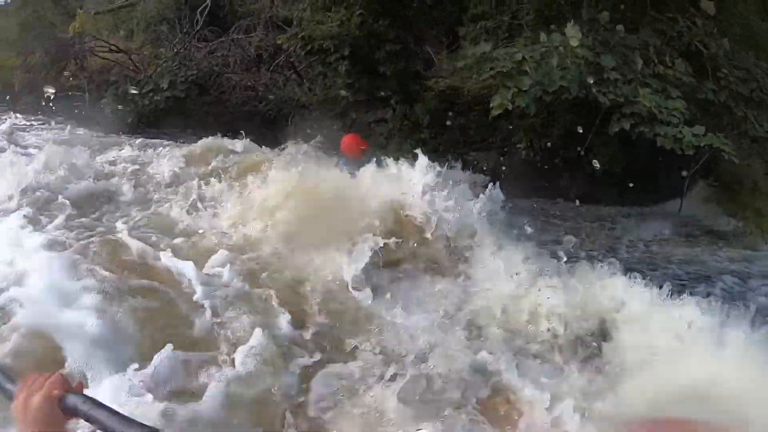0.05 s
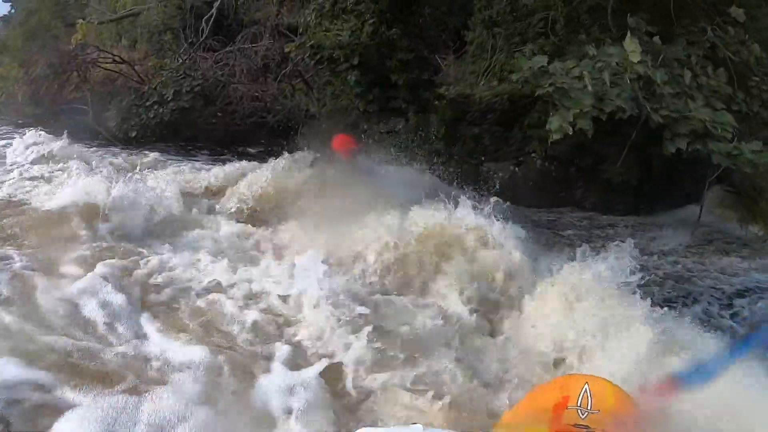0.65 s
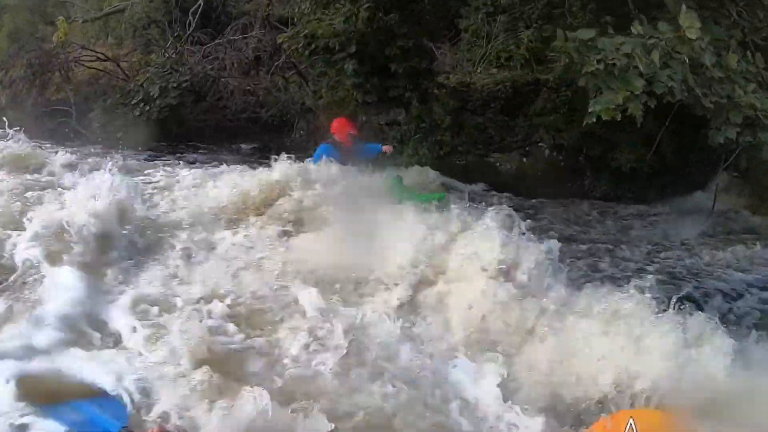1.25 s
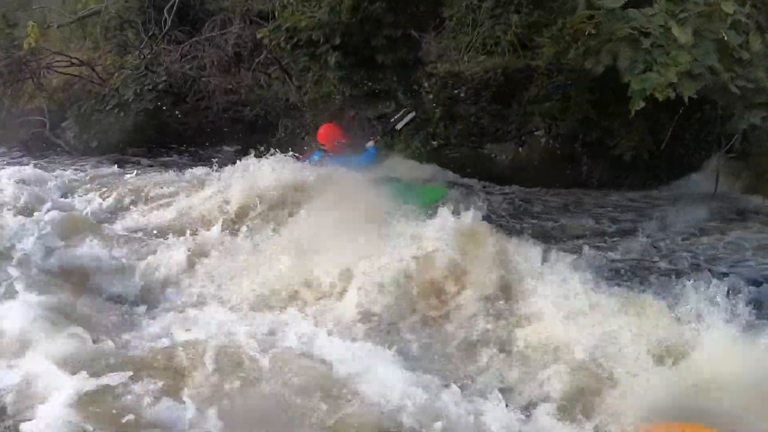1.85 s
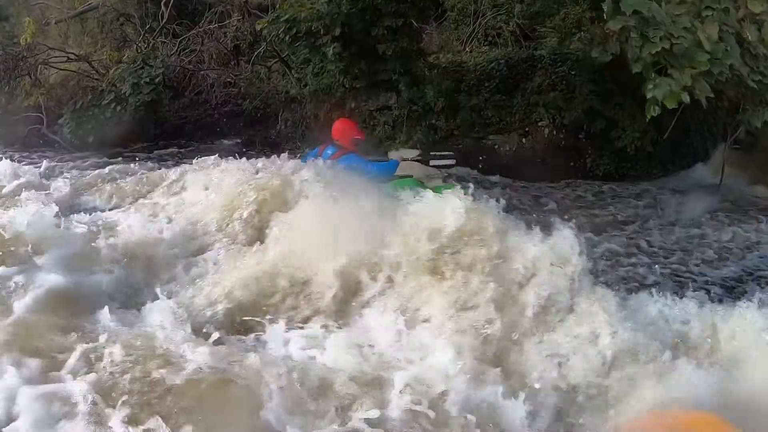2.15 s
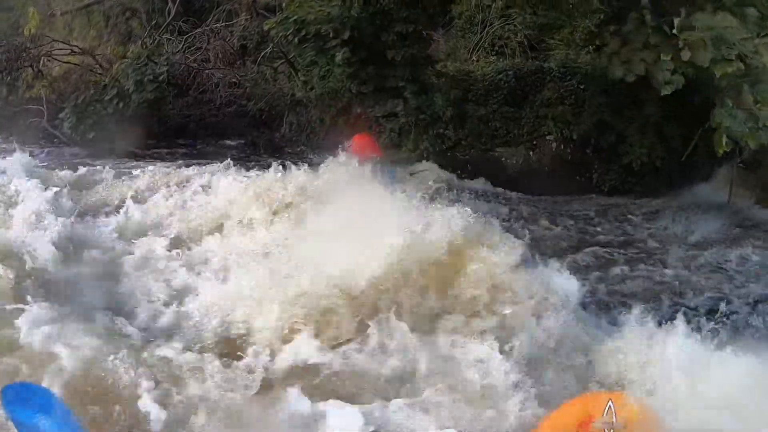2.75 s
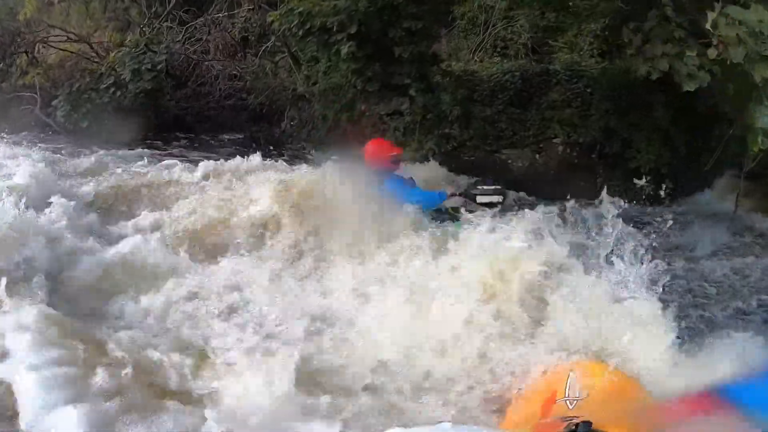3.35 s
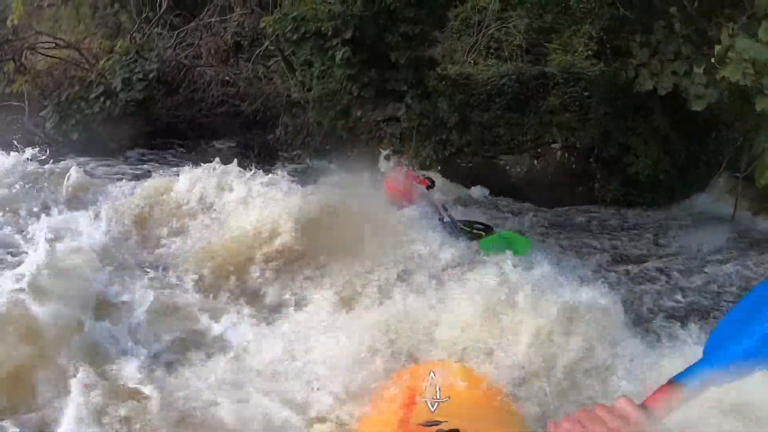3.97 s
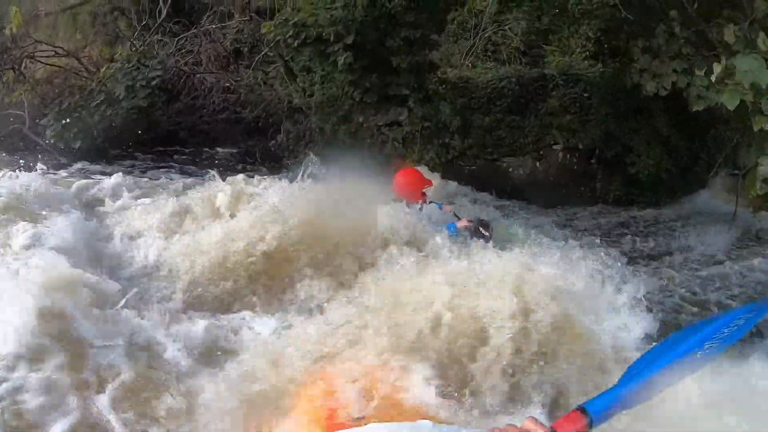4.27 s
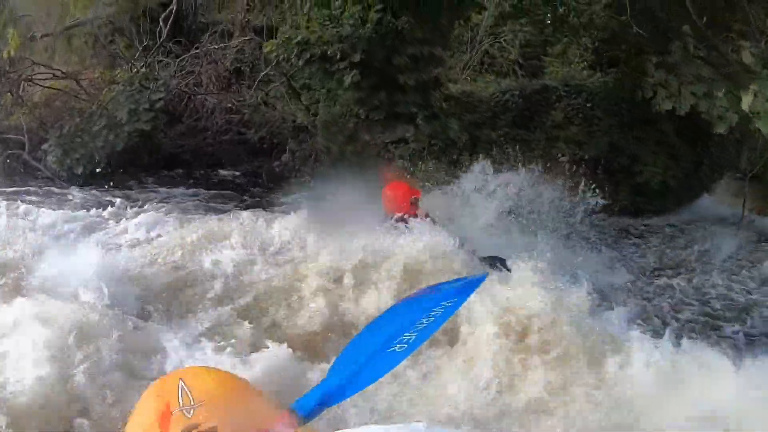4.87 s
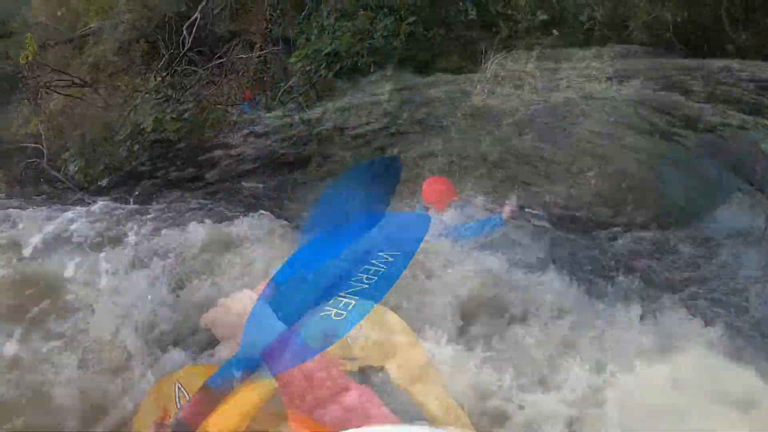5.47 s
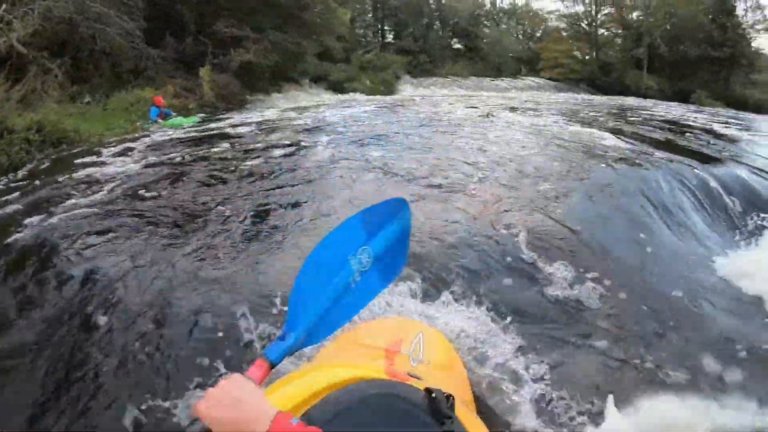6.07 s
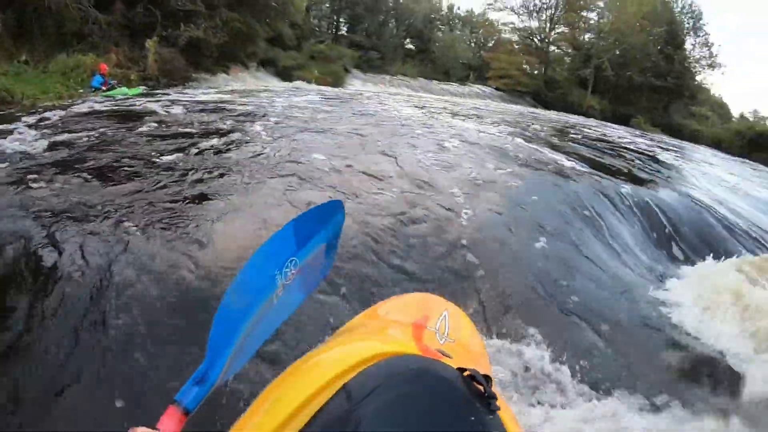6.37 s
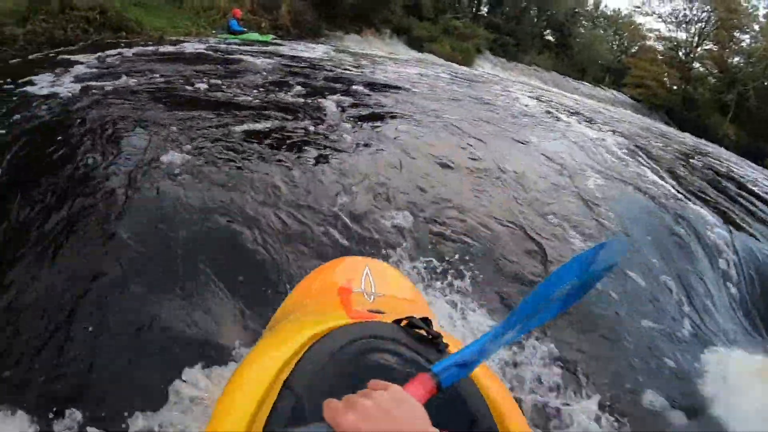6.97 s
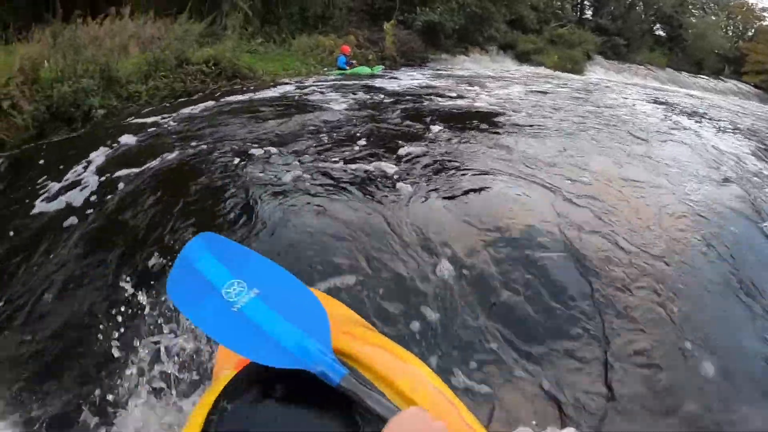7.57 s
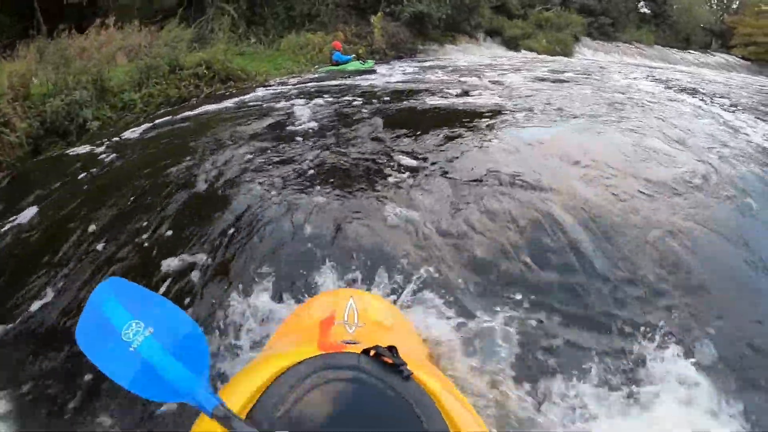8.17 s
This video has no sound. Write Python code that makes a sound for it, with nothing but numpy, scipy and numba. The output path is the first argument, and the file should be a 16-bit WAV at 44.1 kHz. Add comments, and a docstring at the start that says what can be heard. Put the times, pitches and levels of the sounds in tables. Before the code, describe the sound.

Rushing, bubbling weir water surrounds a kayak, with low wind buffets, soft hull bumps, small gulps and a few late paddle strokes.

```python
"""A river weir, from a kayak: in the boil at its foot, then, after a slow dissolve, on the lip above.
Swarms of bubbles ring over a bed of foam; the plunging jet drums below them and spray hisses on top.
Gusts buffet a small two-port camera, waves bump the hull and air pockets gulp beside the boat.
Close by, water slaps, the jet surges, drops tick on the deck and the paddle sloshes."""
import sys
import numpy as np
from scipy import signal
from scipy.fft import rfft, irfft, next_fast_len
from scipy.io import wavfile
from scipy.ndimage import uniform_filter1d
from numba import njit

SR = 44100
rng = np.random.default_rng(int(sys.argv[2]) if len(sys.argv) > 2 else 0)


def unload_audio(sound):
    """Save the sound as a 16-bit wav file, at the path given as the first command line argument."""
    columns = np.transpose(np.atleast_2d(sound))
    # keep every value between -1 and 1, then stretch to whole-number steps
    steps = np.round(np.clip(columns, -1, 1) * 32767)
    wavfile.write(sys.argv[1], SR, steps.astype(np.int16))


N = 362502
TIME_S = np.arange(N) / SR
FFT_SIZE = next_fast_len(N, True)
BIN_HZ = np.fft.rfftfreq(FFT_SIZE, 1 / SR)
SIDES = np.array([[1], [-1]])  # left, right


def undb(db):
    """Decibels to gain."""
    return 10 ** (np.asarray(db) / 20)


def per_bin(rows):
    """Interpolate (freq_hz, value) rows over log frequency."""
    hz, value = np.transpose(rows)
    return np.interp(np.log(np.maximum(BIN_HZ, 1)), np.log(hz), value)


def filtered(x, gain):
    """Apply one gain per bin."""
    return irfft(rfft(x, FFT_SIZE) * gain, FFT_SIZE)[..., :N]


def unit_rms(x):
    """Scale the channel mean to rms 1."""
    return x / np.std(np.atleast_2d(x).mean(axis=0))


def flutter(depth_db, rate_hz):
    """Random gain, held and smoothed twice; depth_db is rms."""
    hold = int(SR / rate_hz)
    steps = np.repeat(rng.standard_normal(N // hold + 2), hold)[rng.integers(hold):][:N]
    smooth = uniform_filter1d(uniform_filter1d(steps, hold), hold)
    return undb(depth_db * unit_rms(smooth))


def swell(peak_s, length_s, rise=0.51):
    """Smooth 0-1-0 hump; rise is the share of its length spent building."""
    ramp = np.interp(TIME_S, peak_s + length_s * np.array([-rise, 0, 1 - rise]), (0, 1, 0))
    return np.sin(np.pi / 2 * ramp) ** 2


@njit
def bubbles(start_s, pitch_hz, amplitude, t60_s, glide):
    """Each bubble rings as a dying sine, its pitch rising by the share glide."""
    out = np.zeros(N)
    for k in range(len(start_s)):
        first, length = int(start_s[k] * SR), int(t60_s[k] * SR) + 2
        step_rad = 2 * np.pi * pitch_hz[k] / SR
        phasor = amplitude[k] + 0j
        step = np.exp(1j * step_rad - np.log(1000) / length)
        bend = np.exp(1j * step_rad * glide / length)
        for i in range(max(first, 0), min(first + length, N)):
            out[i] += phasor.imag
            phasor *= step
            step *= bend
    return out


def froth(count=110000, t60_cycles=16, spread_db=1.5, foam_db=1):
    """A bubble swarm over the even hiss of foam; flat spectrum."""
    when, pitch, rarity, sustain = rng.random((count, 4)).T
    pitch_hz = 120 + 15000 * pitch ** 2
    amplitude = undb(-spread_db * np.log(np.maximum(rarity, 1 / 200)))
    amplitude *= pitch_hz ** 0.75  # small bubbles are brief and share a wide band
    t60_s = t60_cycles * (0.5 + sustain) / pitch_hz
    swarm = bubbles(when * N / SR, pitch_hz, amplitude, t60_s, glide=0.23)
    return unit_rms(swarm) + undb(foam_db) * rng.standard_normal(N)


def water_sheet(colour, balance, coherence, lead):
    """Wide froth: part reaches both ports with a lag, the rest each port alone."""
    share = np.clip(per_bin(coherence), 0, 0.998)
    common = filtered(froth(), np.sqrt(share) * np.exp(0.5j * SIDES * per_bin(lead)))
    separate = filtered(np.array([froth(), froth()]), np.sqrt(1 - share))
    low_cut = BIN_HZ / np.hypot(BIN_HZ, 30)
    pan = np.sqrt(2 / (1 + undb(-2 * SIDES * per_bin(balance))))
    return filtered(common + separate, low_cut * undb(per_bin(colour)) * pan)


# Water spectrum: freq_hz, gain_db
FOOT_COLOUR = [(35, -6.5), (55, -6), (90, -7), (122, -11), (178, -4.5), (256, -8), (553, -12.5),
               (698, -10.5), (800, -7.5), (880, -6), (1040, -3.5), (1270, 0.8), (2000, -3), (2170, -1.5),
               (2800, -8), (3200, -3), (3500, -6.5), (3920, -16), (4860, -12), (5250, -15), (5700, -16),
               (6880, -22), (9210, -22.5), (10900, -39), (12100, -40), (14800, -49)]
# Port balance: freq_hz, left_minus_right_db
FOOT_BALANCE = [(87, -1.5), (488, 1.2), (671, 4.5), (1240, -6.5), (1610, 3), (1830, 0.5), (2860, -4.5),
                (2970, 0.5), (3740, -11.5), (4990, -0.5), (5520, -4.5), (7550, 0.5), (14700, -2.5)]
# Port likeness: freq_hz, coherence
FOOT_COHERENCE = [(87, 0.997), (465, 0.991), (780, 0.55), (900, 0.93), (1060, 0.92), (1205, 0.3),
                  (1310, 0.84), (1840, 0.62), (2030, 0.27), (2550, 0.82), (2850, 0.2), (3150, 0.9),
                  (3500, 0.85), (3860, 0.26), (5010, 0.78), (5830, 0.17), (6300, 0.53), (14700, 0.02)]
# Port phase: freq_hz, left_lead_rad
FOOT_LEAD = [(87, 0.18), (493, -0.22), (644, -1.0), (830, -3.0), (1150, -3.4), (1260, -6.6), (1480, -6.5),
             (1840, -5.14), (2780, -6.5), (2900, -4.0), (3730, -5.17), (3910, -9.02), (7670, -9.79),
             (8560, -5.34), (14800, -6.87)]


def foot_water():
    """The boil at the foot of the weir."""
    return water_sheet(FOOT_COLOUR, FOOT_BALANCE, FOOT_COHERENCE, FOOT_LEAD)


# Water spectrum: freq_hz, gain_db
LIP_COLOUR = [(40, -13), (75, -20), (108, -30), (132, -15.5), (164, -10), (240, -11), (380, -11.5),
              (520, -14.5), (609, -12), (960, -2), (1160, 3), (1510, 0.4), (1640, 2.5), (2330, -0.5),
              (2520, -4.5), (3250, -4.5), (3430, -10.5), (4140, -21.5), (4820, -13.5), (7140, -26.5),
              (8480, -24), (11000, -41), (14300, -53)]
# Port balance: freq_hz, left_minus_right_db
LIP_BALANCE = [(87, 0.5), (510, -0.5), (604, 7.5), (1190, -8.5), (1380, -2.5), (3100, -1.5), (3790, -7.5),
               (4120, -4.5), (5240, 2.5), (5460, -6), (6970, -1.5), (7470, 2), (14600, -2)]
# Port likeness: freq_hz, coherence
LIP_COHERENCE = [(86, 0.997), (430, 0.986), (552, 0.72), (765, 0.61), (1200, 0.65), (1840, 0.82),
                 (2050, 0.34), (2870, 0.52), (3080, 0.79), (4180, 0.16), (4760, 0.87), (6430, 0.45),
                 (7030, 0.01), (9130, 0.57), (11500, 0.0), (14800, 0.44)]
# Port phase: freq_hz, left_lead_rad
LIP_LEAD = [(90, 0.27), (573, -0.3), (762, -1.18), (1390, -6.12), (1790, -5.8), (2080, -6.92),
            (3030, -5.07), (3820, -5.89), (4330, -9.29), (6790, -10.09), (8280, -5.64), (8550, -5.56),
            (9540, -6.64), (14800, -6.28)]


def lip_water():
    """White water heard from the lip."""
    return water_sheet(LIP_COLOUR, LIP_BALANCE, LIP_COHERENCE, LIP_LEAD)


def water_band(places, low_hz, high_hz, foot_db, lip_db, dissolve_s=(5.18, 6.13), fade_power=1.09):
    """One band of the water; the foot fades out as the lip fades in."""
    band = 1 / (1 + (BIN_HZ / high_hz) ** 16) - 1 / (1 + (BIN_HZ / low_hz) ** 16)
    foot, lip = (unit_rms(filtered(place, band)) for place in places)
    fade = np.interp(TIME_S, dissolve_s, (0, 1))
    return (1 - fade) ** fade_power * undb(foot_db) * foot + fade ** fade_power * undb(lip_db) * lip


# Passing crests (+) and troughs (-): peak_s, length_s, churn_db, spray_db, left_minus_right_db
WAVES = [(0.216, 0.19, 0.8, 0.5, .3), (1.067, 0.41, -1, 0.5, -0.5), (1.477, 0.69, -1.2, -1.5, 0.5),
         (1.88, 0.52, 0.5, 0, 0), (3.085, 0.13, 1.5, 1.5, -0.5), (3.404, 0.14, 2, 0, 0),
         (3.82, 0.16, 1.7, 0.5, .2), (4.2, 1, 1, 0, 0), (4.877, 0.68, 1.7, 1, -0.3), (5.36, 0.54, 1, 1, -1),
         (6.082, 0.76, 0.2, -0.5, 0), (6.714, 0.29, 0.2, -0.7, -2), (7.137, 0.41, 0.5, 0, -1.2),
         (7.466, 0.15, -1.5, -2, -1), (7.85, 0.34, 1.3, 2.5, 1)]


def weir(plunge_follow=0.4):
    """Plunging jet, churning bubbles, fine spray; waves lift or lower them and pan the upper two."""
    places = foot_water(), lip_water()
    churn_db, spray_db, side_db = sum(np.outer(lifts_db, swell(peak_s, length_s))
                                      for peak_s, length_s, *lifts_db in WAVES)
    plunge = water_band(places, 27, 731, foot_db=-34, lip_db=-37.5) * flutter(0.5, 12)
    churn = water_band(places, 729, 3900, foot_db=-23.5, lip_db=-24) * flutter(0.56, 15)
    spray = water_band(places, 3716, SR / 2, foot_db=-38.5, lip_db=-40.5) * flutter(0.38, 18)
    upper = churn * undb(churn_db) + spray * undb(spray_db)
    water = plunge * undb(plunge_follow * churn_db) + upper * undb(SIDES * side_db / 2)
    small_waves = flutter(depth_db=0.08, rate_hz=12)
    return water * small_waves


# Wind spectrum: freq_hz, gain_db
WIND_COLOUR = [(5, -6), (13, 2.5), (24, -0.5), (42, -20), (80, -18), (115, -31), (200, -58), (600, -80)]
# Gusts: peak_s, length_s, level_db
GUSTS = [(.38, 0.63, -28.5), (0.872, 0.14, -39), (1.09, 0.27, -32), (1.375, 0.32, -26), (1.8, 0.41, -42),
         (3.6, .38, -37), (6.06, 0.55, -35), (6.76, 0.75, -36), (7.323, 0.26, -35), (7.51, 0.18, -38),
         (8.12, 0.32, -40)]


def wind(breeze_db=-41, separate_db=-10, right_db=3):
    """Eddies press on both ports nearly alike, harder on the right."""
    eddies = rng.standard_normal(N) + undb(separate_db) * rng.standard_normal((2, N))
    rumble = unit_rms(filtered(eddies * undb([[0], [right_db]]), undb(per_bin(WIND_COLOUR))))
    gusts = sum(undb(level_db) * swell(peak_s, length_s) for peak_s, length_s, level_db in GUSTS)
    return rumble * (undb(breeze_db) + gusts) * flutter(depth_db=2, rate_hz=32)


# Waves on the hull: peak_s, length_s, pitch_hz, level_db
BUMPS = [(0.264, .13, 56, -31), (1.372, .18, 27, -25), (1.775, .1, 74, -33), (3.085, .14, 66, -32),
         (3.252, .15, 34, -29), (3.45, .13, 68, -34), (3.579, .17, 42, -29), (4.81, .14, 45, -34),
         (6.59, .11, 35, -31), (6.79, .11, 34, -32.5), (6.942, .12, 44, -27.5), (7.022, .11, 68.4, -36),
         (7.3, .12, 41, -33), (7.339, .1, 70, -32)]


def hull_bumps():
    """Each wave pushes the hull softly, so its low note swells before it dies."""
    out = np.zeros(N)
    for peak_s, length_s, pitch_hz, level_db in BUMPS:
        note = np.sin(2 * np.pi * pitch_hz * (TIME_S - peak_s))
        out += undb(level_db) * note * swell(peak_s, length_s, rise=0.46)
    return out


# Air pockets: start_s, pitch_hz, level_db, t60_s
GULPS = [(0.247, 540, -29, .1), (2.709, 344, -27, 0.12), (3.361, 252, -26.5, 0.092),
         (6.681, 190, -29.5, 0.11), (7.763, 222, -27, 0.087), (7.983, 490, -27.5, .07),
         (8.009, 390, -21, 0.042)]


def gulps():
    """Big air pockets close beside the boat and ring as single bubbles."""
    start_s, pitch_hz, level_db, t60_s = np.array(GULPS, float).T.copy()
    return bubbles(start_s, pitch_hz, undb(level_db), t60_s, glide=0.065)


# Sheets of water slapping down: peak_s, length_s, pitch_hz, level_db
SLAPS = [(2.055, .012, 1450, -21), (4.325, .016, 1500, -24), (6.650, 0.012, 1250, -26),
         (6.781, 0.013, 1870, -27), (6.884, 0.015, 2000, -22), (7.013, 0.021, 1600, -26)]
# Jet surges under the boil: peak_s, length_s, pitch_hz, level_db
SURGES = [(2.4, 0.71, 168, -38), (3.62, .4, 172, -40)]
# Drops on the deck: peak_s, length_s, pitch_hz, level_db
DROPS = [(5.565, .004, 5600, -40), (6.606, .004, 5600, -40), (7.534, .004, 5600, -39),
         (7.817, .004, 5600, -38.5), (7.872, .004, 5600, -39)]
# Paddle strokes: peak_s, length_s, pitch_hz, level_db
STROKES = [(6.42, 0.63, 870, -37.5), (6.74, 0.32, 1690, -30.5), (7.045, 0.72, 1620, -30),
           (7.2, .45, 855, -42), (7.95, 0.32, 1400, -31)]


def splashes(left_lead_s=60e-6, left_db=1):
    """Bands of nearby froth: slaps and drops burst, surges and strokes swell and sink."""
    lead = np.exp(1j * np.pi * SIDES * BIN_HZ * left_lead_s)
    near = filtered(froth(), lead) * undb(SIDES * left_db / 2)

    def clouds(rows, relative_width, rise):
        out = np.zeros((2, N))
        for peak_s, length_s, pitch_hz, level_db in rows:
            band = 1 / (1 + ((BIN_HZ - pitch_hz) / (relative_width * pitch_hz / 2)) ** 2)
            out += undb(level_db) * unit_rms(filtered(near, band)) * swell(peak_s, length_s, rise)
        return out

    bursts = clouds(SLAPS + DROPS, relative_width=0.66, rise=0.33)
    sloshes = clouds(SURGES + STROKES, relative_width=0.42, rise=0.51)
    return bursts + sloshes


def scene():
    """The weir all round; wind and boat close by."""
    return weir() + wind() + hull_bumps() + gulps() + splashes()


def record(dry):
    """The camera cuts the top."""
    cutoff_hz = 15100
    return signal.sosfilt(signal.ellip(10, 0.1, 80, cutoff_hz, fs=SR, output="sos"), dry)


dry = scene()
out = record(dry)
unload_audio(out)
```